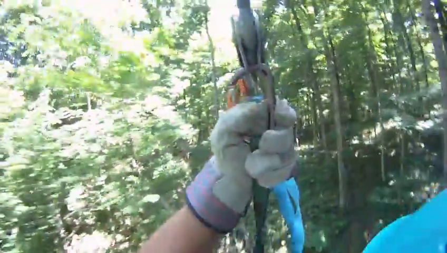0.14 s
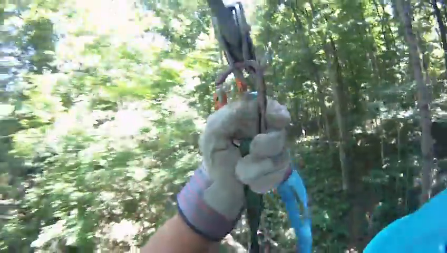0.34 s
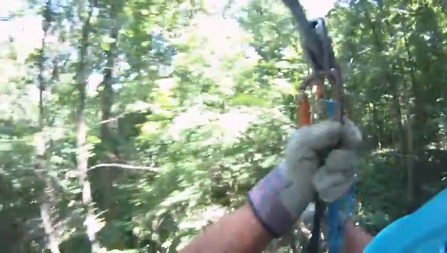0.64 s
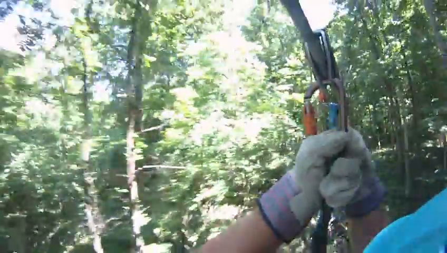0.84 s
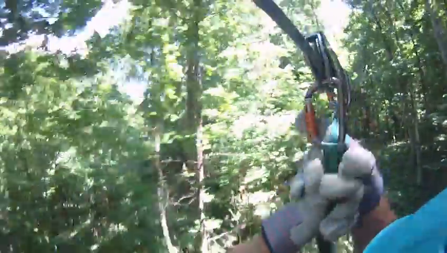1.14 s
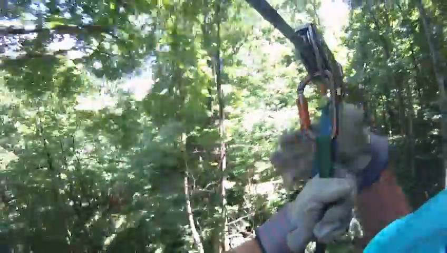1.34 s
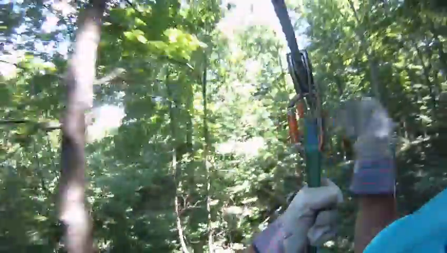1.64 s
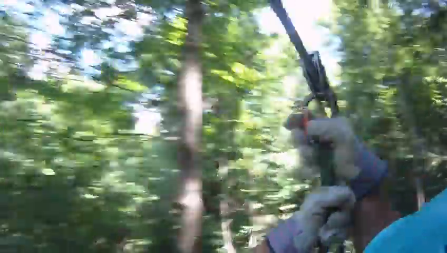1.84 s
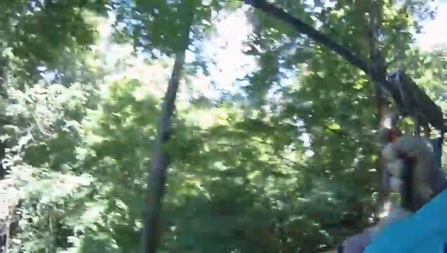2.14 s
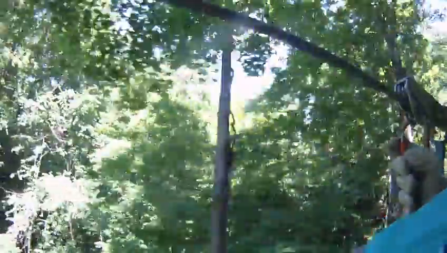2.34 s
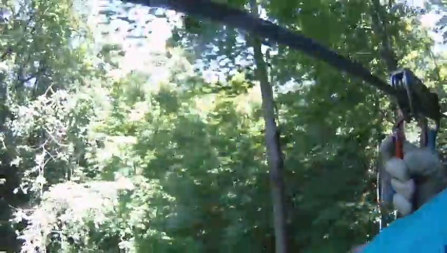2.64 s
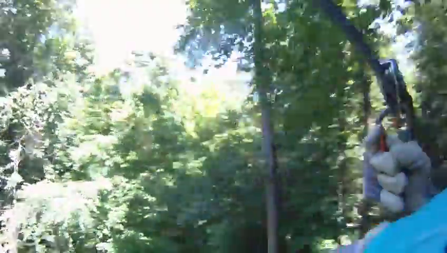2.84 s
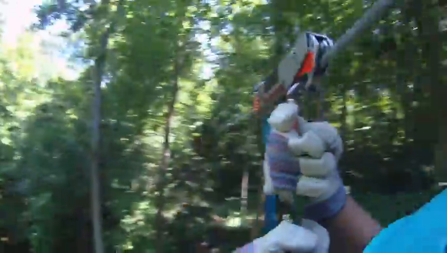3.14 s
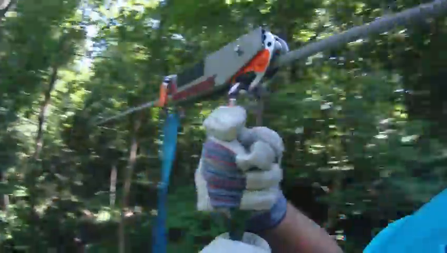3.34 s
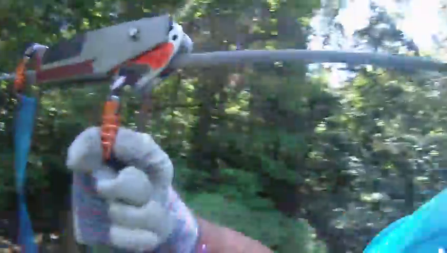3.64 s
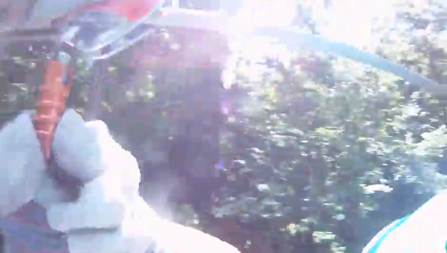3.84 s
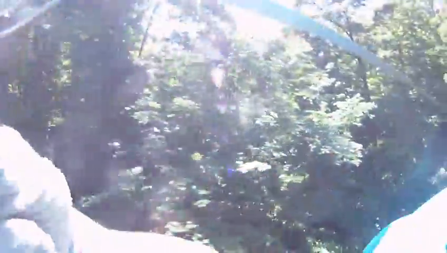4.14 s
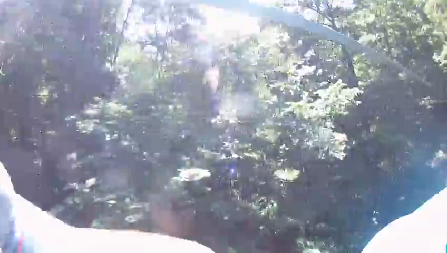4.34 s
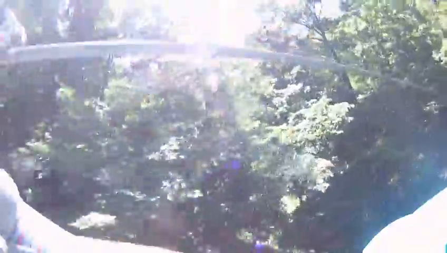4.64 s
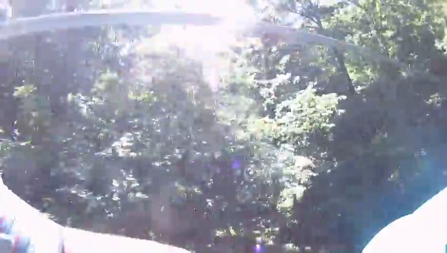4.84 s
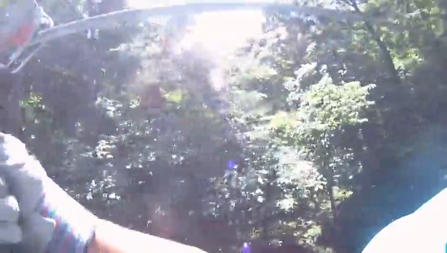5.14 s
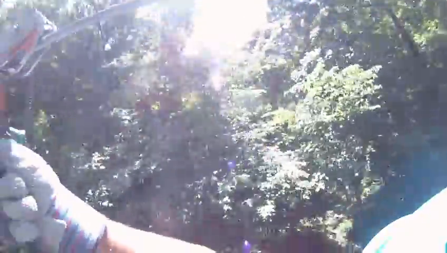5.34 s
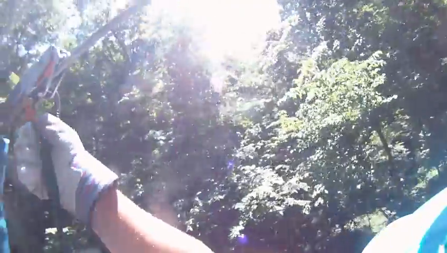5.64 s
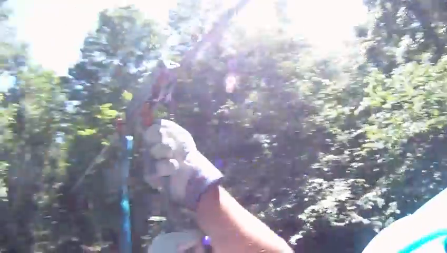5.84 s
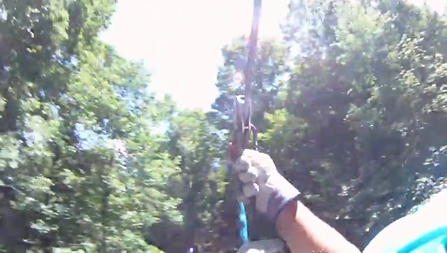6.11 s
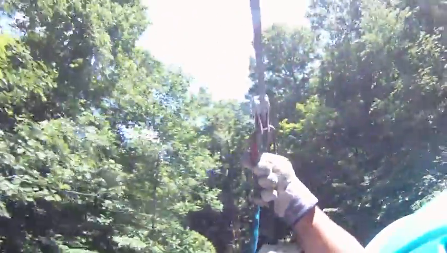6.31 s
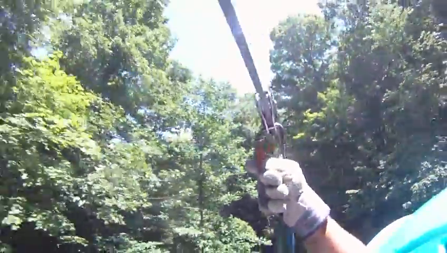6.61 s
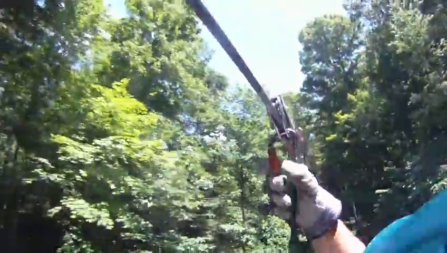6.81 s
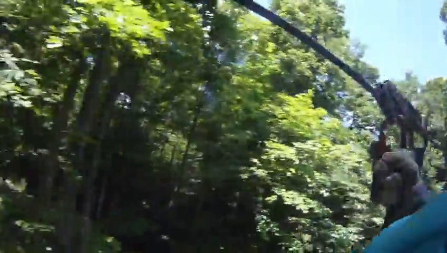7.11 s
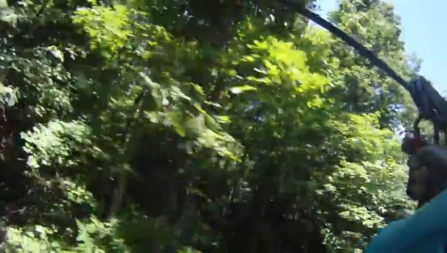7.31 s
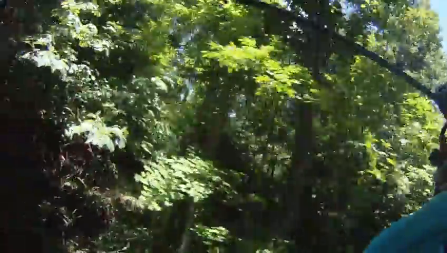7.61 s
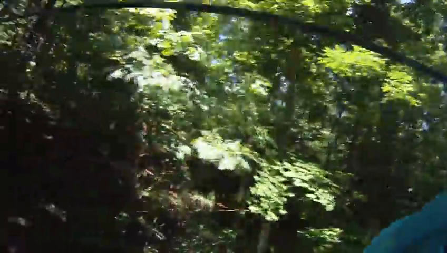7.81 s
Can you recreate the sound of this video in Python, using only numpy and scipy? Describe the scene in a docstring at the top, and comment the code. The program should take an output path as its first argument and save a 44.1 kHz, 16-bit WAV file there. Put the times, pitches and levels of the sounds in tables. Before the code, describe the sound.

Harsh, steady metallic whirring of small wheels racing over a stranded cable, with snapping ticks, dull gear knocks and low air rumble.

```python
"""Zip line trolley ride

Sheaves chatter over the wire strands of a steel cable; clicks, hiss and sharp ticks ring the metal frame.
The frame's colour changes as the rider swings round. Swept sines make the faint strand whine that follows the
speed, over a hum of shaped noise. Decaying sines make the gear's knocks, noise puffs the shifting webbing,
and low shaped noise the air rumbling at the microphone."""
import sys
import numpy as np
from scipy import signal
from scipy.fft import rfft, irfft, next_fast_len
from scipy.io import wavfile
from scipy.ndimage import uniform_filter1d, minimum_filter1d

SR = 44100
rng = np.random.default_rng(int(sys.argv[2]) if len(sys.argv) > 2 else 0)


def wav_record(signal):
    """Record a signal, one row per channel, as 16-bit PCM in the file named by sys.argv[1]."""
    frames = np.transpose(np.atleast_2d(signal))
    bounded = np.clip(frames, -1, 1)
    # unit amplitude maps onto the largest positive 16-bit level
    quanta = np.round(bounded * 32767).astype(np.int16)
    wavfile.write(sys.argv[1], SR, quanta)


N = 351459
TAPS = 4096
TIME = np.arange(N) / SR
BINS_HZ = np.fft.rfftfreq(TAPS, 1 / SR)

# Trolley frame modes. Each row: frequency in Hz, half-width at half amplitude in Hz, then relative level in dB
# seen edge-on, from the right side, from the left side.
FRAME_MODES = [ (770, 114, -27, -26, -27), (1094, 28, -6, -3, -2), (1254, 30, -17.5, -24, -17.5),
               (1454, 134, -16, -15.5, -14), (1784, 70, -13, -6.5, -9.5), (2095, 107, -1, -55, -4.5),
               (2201, 54, -57, 5.5, -6), (2340, 168, -4, -7, 0), (2720, 74, -57, -14.5, -55),
               (2940, 69, -12.5, -5.5, -9), (3162, 86, -11.5, -57, -8), (3647, 122, 2, -0.5, 3),
               (3843, 176, -0.5, -2, -2.5), (4397, 107, -14, -7, -8.5), (4680, 140, -15, -10.5, -9.5),
               (5272, 293, -8, -13.5, -12), (5530, 89, -13.5, -37, -16), (6550, 202, -9.5, -17.5, -14),
               (6890, 217, -12.5, -15, -15), (7520, 174, -16, -11.5, -12), (8150, 117, -6.5, -6.5, -5),
               (8376, 81, -5.5, -7.5, -2.5), (8650, 150, -16.5, -35, -23), (9090, 95, -21, -15.5, -14.5),
               (9750, 178, -17, -15, -12), (9840, 53, -28, -9.5, -24), (10570, 77, -24.5, -25, -27),
               (14900, 200, -50, -51, -66), (14130, 78, -15, -12, -12), (14660, 130, -20.5, -19, -16.5)]
# Side of the trolley facing the rider. Each row: time in seconds, side (-1 right, 0 edge-on, 1 left; clipped).
FACING_SIDE = [(0, 0.057), (.4, -0.36), (.6, 0.088), (1.85, 0.11), (2.15, -0.98), (2.85, -0.65),
               (3.25, -0.27), (3.5, 1), (5.8, 1), (6.05, 0.25), (6.9, -0.39), (7.2, -0.87), (7.97, -1.5)]
# How hard the sheaves bear on the cable. Each row: time in seconds, relative whir level in dB.
WHIR_LEVEL = [(0.0, -16.5), (0.25, -15), (1.2, -17.0), (1.4, -16), (2.25, -19.5), (2.6, -19), (2.85, -17),
              (3.55, -16), (3.9, -13.5), (4.15, -15.5), (4.35, -14.5), (5.2, -14), (5.75, -17.1),
              (6.2, -23), (6.5, -22.5), (7.05, -19.5), (7.55, -21.5), (7.96, -19)]
# Trolley speed. Each row: time in seconds, strand passing rate in Hz.
STRAND_RATE = [(0, 522), (.35, 538), (1.3, 541), (1.97, 577), (2.3, 530), (2.8, 585), (3.15, 562),
               (3.55, 512), (3.93, 570), (4.42, 526), (4.72, 543), (5.08, 526), (5.35, 541), (6.12, 499),
               (6.55, 510), (7.2, 486), (7.5, 458), (7.97, 420)]
# Sharpest ticks of a sheave on a proud wire. Each row: time in seconds, relative level in dB.
HARD_TICKS = [(1.2411, -4), (3.3199, 0), (3.4376, 0), (3.7194, 1), (3.9639, -1), (4.6069, -1), (4.9651, 0)]
# Clicks against smooth rolling. Each row: frequency in Hz, click-to-hiss ratio in dB.
CLICK_TO_HISS = [(1000, -9.5), (2500, -8), (3700, -1), (4700, -9), (6200, 11), (7500, 1), (8400, -6.5),
                 (15000, 12.5)]
# Frame's low mode. Each row: time in seconds, relative level in dB.
LOW_MODE_LEVEL = [(0.0, -39.5), (0.5, -34.5), (0.95, -38), (1.2, -32), (1.75, -35), (2.0, -41.5),
                  (3.3, -36), (4.05, -47), (5.45, -36.5), (6.45, -43), (7.35, -39.5), (7.96, -42.5)]
# Frame modes swelling as the load shifts. Each row: time in seconds, middle modes against the whir table in
# relative dB, main modes likewise.
MODE_SWELLS = [(0, -5.2, -4), (0.4, -7, -2), (0.62, -10.5, -4.5), (1.3, -12.5, -4.5), (1.95, -10, -3),
               (2.15, -6, -4.5), (2.8, -4.6, -5.5), (3.15, -11, -3.6), (3.55, -6.7, 1), (3.82, -6.4, -3.5),
               (4.15, -7.5, -1), (4.7, -5, -3.5), (5.78, -2.5, -3), (5.97, -8, -0.7), (6.4, -5.5, -7.5),
               (7.25, -7, -5.5), (7.65, -3, -4), (7.96, -5, -3)]
# How strongly the cable sounds. Each row: time in seconds, mean strand whine level in dB.
WHINE_LEVEL = [(0, -63), (1.2, -59), (1.95, -54), (2.3, -59.5), (2.85, -54.5), (3.7, -53), (4.7, -59),
               (5.3, -56.5), (5.9, -68), (6.9, -58), (7.97, -73)]
# Low hum of the cable. Each row: frequency in Hz, relative density in dB per Hz.
HUM_SPECTRUM = [(200, 9), (330, -22), (480, -10), (620, 13.5), (800, 15), (1000, -12), (1500, -44),
                (4000, -80)]
# Air at the microphone. Each row: frequency in Hz, relative density in dB per Hz.
AIR_SPECTRUM = [(8.8, -45), (15, 7), (45, 0), (73, 0.5), (95, -4.5), (128, -13.5), (216, -14.5), (265, -24),
                (329, -25.5), (480, -22), (620, -65), (1060, -120)]
# Stronger buffets of air. Each row: centre in seconds, length between 1/e points in seconds, relative level in dB.
AIR_GUSTS = [(2.17, .1, -40), (2.48, 0.15, -40), (3.08, 0.11, -44), (4.52, .14, -50), (5.65, 0.58, -45),
             (6.05, 0.13, -41.5), (7.42, .14, -43), (7.72, .16, -48)]
# Dull knocks of the gear. Each row: start in seconds, relative level in dB.
GEAR_KNOCKS = [(1.419, -44), (5.801, -35.5), (5.899, -36)]
# Gear modes. Each row: frequency in Hz, relative level in dB, 60 dB decay time in seconds.
GEAR_MODES = [(229, -20, 0.035), (430, -6, 0.046), (556, -7, .03), (686, 0, 0.055), (755, -3, .05)]
# Webbing shifting under load. Each row: centre in seconds, length between 1/e points in seconds, level in dB.
WEBBING_PUFFS = [(2.076, .07, -49), (2.17, 0.048, -56), (2.923, 0.21, -59), (3.92, 0.091, -60),
                 (6.94, 0.078, -52)]
# Webbing noise. Each row: frequency in Hz, relative density in dB per Hz.
WEBBING_SPECTRUM = [(60, -15), (150, 3.5), (280, -3), (420, -5), (700, -8), (1500, -30), (5000, -70)]


def gain_of(db):
    """Decibels to amplitude."""
    return 10 ** (np.asarray(db) / 20)


def evened(x):
    """Scales to an rms of 1."""
    return x / np.sqrt(np.mean(x ** 2) + 1e-20)


def curve(rows, axis=1):
    """One column of a time table, interpolated at every sample."""
    rows = np.asarray(rows, float)
    return np.interp(TIME, rows[:, 0], rows[:, axis])


def spectrum(points, hz):
    """Amplitude of a (Hz, dB) table, interpolated on a log-frequency axis."""
    f, db = np.transpose(points)
    return gain_of(np.interp(np.log(hz + 1), np.log(f + 1), db))


def noise(shape):
    """Noise of about rms 1 whose amplitude spectrum follows shape(Hz)."""
    size = next_fast_len(N)
    white = rfft(rng.standard_normal(size))
    shaped = irfft(white * shape(np.fft.rfftfreq(size, 1 / SR)), size)
    return evened(shaped[:N])


def flutter(top_hz):
    """Random motion of rms 1, mostly from about 2 Hz to top_hz."""
    return noise(lambda hz: hz / (hz + 2) / (1 + (hz / top_hz) ** 2))


def ring(x, gain):
    """Minimum-phase body with this gain at BINS_HZ: sharp attack, then ringing."""
    two_sided = np.r_[gain, gain[-2:0:-1]]
    log_gain = np.log(np.maximum(two_sided, 1e-6))
    response = np.fft.ifft(np.exp(np.conj(signal.hilbert(log_gain)))).real
    return signal.oaconvolve(x, response)[:N]


def blows(rows):
    """One impulse for each (s, dB) row."""
    s, db = np.transpose(rows)
    return np.bincount(np.round(s * SR).astype(int), gain_of(db), N)[:N]


def puffs(rows):
    """A Gaussian rise and fall of amplitude for each (centre s, length s, dB) row."""
    return sum(gain_of(db) * np.exp(-(2 * (TIME - s) / length) ** 2) for s, length, db in rows)


def load_db():
    """Load on the sheaves, taken as the whir level above its mean."""
    whir_db = curve(WHIR_LEVEL)
    return whir_db - whir_db.mean()


def facing():
    """Side of the trolley the rider sees, -1 right to 1 left."""
    return np.clip(curve(FACING_SIDE), -1, 1)


def force(chatter_hz=110, chatter_db=0.68, chatter_db_per_load_db=.15, rock_hz=14, rock_db=0.42,
          repeat=0.54, strands_per_turn=44):
    """The contact force chatters, more under load and partly alike in each turn of the sheave."""
    turns = np.cumsum(curve(STRAND_RATE)) / SR / strands_per_turn
    mean_turn_s = TIME[-1] / turns[-1]
    groove = np.interp(turns % 1 * mean_turn_s, TIME, flutter(chatter_hz))
    repeating = repeat * evened(groove - groove.mean())
    bumps = repeating + np.sqrt(1 - repeat ** 2) * flutter(chatter_hz)
    depth_db = chatter_db + chatter_db_per_load_db * load_db()
    return gain_of(depth_db * bumps + rock_db * flutter(rock_hz))


def click_share():
    """Amplitude share of clicks at each frequency; smooth hiss supplies the remaining power."""
    ratio = spectrum(CLICK_TO_HISS, BINS_HZ)
    return ratio / np.hypot(1, ratio)


def contacts(spread_db=3.0, jitter_strands=.25, jitter_hz=300, strays_per_s=350):
    """Jittered strand crossings click, single wires add stray clicks, and smooth rolling hisses."""
    travel_strands = np.cumsum(curve(STRAND_RATE)) / SR
    strands = np.floor(travel_strands + jitter_strands * flutter(jitter_hz))
    crossing = np.diff(strands, prepend=0) > 0
    hit = crossing | (rng.random(N) < strays_per_s / SR)
    hardness = np.minimum(rng.exponential(1, N), 2.5)
    clicks = evened(hit * gain_of(spread_db * hardness) * rng.choice([-1, 1], N))
    share = click_share()
    hiss = ring(rng.standard_normal(N), np.sqrt(1 - share ** 2))
    return ring(clicks, share) + hiss


def frame(drive):
    """The frame's modes ring; each side radiates them in its own proportions."""
    modes = np.array(FRAME_MODES, float)
    side_seen = facing()
    offset = (BINS_HZ[:, None] - modes[:, 0]) / modes[:, 1]
    bells = 1 / (1 + offset ** 2) ** 2  # power
    shares = 1 - abs(side_seen), np.maximum(-side_seen, 0), np.maximum(side_seen, 0)
    sides = [evened(np.sqrt(bells @ gain_of(db) ** 2)) for db in modes[:, 2:].T]
    return sum(share * ring(drive, side) for share, side in zip(shares, sides))


def swell(x, edges_hz, level_db):
    """Makes the modes in one band grow and fade to their own slow rms level."""
    band = signal.butter(2, edges_hz, "bandpass", fs=SR, output="sos")
    part = signal.sosfiltfilt(band, x)
    slow_rms = np.sqrt(abs(uniform_filter1d(part ** 2, SR // 3)) + 1e-12)
    return x + part * (gain_of(level_db) / slow_rms - 1)


def ticks(tick_db=9, stray_db=22, spread_db=4, strays_per_s=30, band_hz=(4200, 7600)):
    """Proud wires strike the sheaves with a thin, bright snap: a few hard ones, lighter ones at random."""
    stray_hits = rng.random(N) < strays_per_s / SR
    strays = stray_hits * gain_of(spread_db * (2 * rng.random(N) - 1))
    strikes = gain_of(tick_db) * blows(HARD_TICKS) + strays * gain_of(curve(WHIR_LEVEL) + stray_db)
    return signal.sosfilt(signal.butter(2, band_hz, "bandpass", fs=SR, output="sos"), strikes)


def trolley(whir_db=0.37, low_db=-2.14, middle_db=-0.7, main_db=-0.65, buzz_db=1.0, buzz_hz=110,
            low_hz=(1035, 1155), middle_hz=(1900, 2550), main_hz=(3400, 4050)):
    """Rolling contacts and ticks excite the same frame; the whir's main modes buzz with a random flutter."""
    level_db = curve(WHIR_LEVEL)
    whir = evened(frame(force() * contacts())) * gain_of(level_db + whir_db)
    whir = swell(whir, low_hz, curve(LOW_MODE_LEVEL) + low_db)
    whir = swell(whir, middle_hz, level_db + curve(MODE_SWELLS, axis=1) + middle_db)
    buzz = buzz_db * flutter(buzz_hz)
    whir = swell(whir, main_hz, level_db + curve(MODE_SWELLS, axis=2) + main_db + buzz)
    return whir + frame(ticks())


def cable(wobble=0.0087, wobble_hz=25.5, waver_db=1.5, octave_db=-3, sing_db=-7.5, mode_hz=1088,
          mode_width_hz=48, hum_db=-52, follow_load=.35, follow_whine=0.18):
    """Passing strands whine over a soft hum; the octave sings out on crossing the frame's low mode."""
    strand_hz, whine_db = curve(STRAND_RATE), curve(WHINE_LEVEL)
    phase = 2 * np.pi * np.cumsum(strand_hz * (1 + wobble * flutter(wobble_hz))) / SR
    whine = gain_of(whine_db + waver_db * flutter(6.4))
    in_tune = 1 / (1 + ((2 * strand_hz - mode_hz) / mode_width_hz) ** 2)
    singing = in_tune * gain_of(curve(LOW_MODE_LEVEL) + sing_db + waver_db * flutter(20))
    octave = gain_of(octave_db) * whine + singing
    tones = np.sqrt(2) * (whine * np.sin(phase) + octave * np.sin(2 * phase))  # rms levels to peaks
    hum = gain_of(hum_db + follow_load * load_db() + follow_whine * (whine_db - whine_db.mean()))
    return tones + hum * noise(lambda hz: spectrum(HUM_SPECTRUM, hz))


def air(level_db=-47.0, shelter_db=3.5, lump_db=1.9, lump_hz=11, lull_s=4.0, lull_length_s=.7, lull_db=-4.5):
    """Passing air rumbles lumpily, weaker as the rider swings to the trolley's left, with gusts and one lull."""
    level = np.hypot(gain_of(level_db - shelter_db * facing()), puffs(AIR_GUSTS))
    lull = lull_db * np.exp(-(2 * (TIME - lull_s) / lull_length_s) ** 2)
    rumble = noise(lambda hz: spectrum(AIR_SPECTRUM, hz))
    return rumble * level * gain_of(lull + lump_db * flutter(lump_hz))


def gear():
    """Harness gear knocks: each blow starts a few short, decaying modes."""
    t = TIME[:TAPS]
    knock = sum(gain_of(db - 60 * t / t60_s) * np.sin(2 * np.pi * hz * t) for hz, db, t60_s in GEAR_MODES)
    return signal.oaconvolve(blows(GEAR_KNOCKS), knock)[:N]


def webbing():
    """Harness straps shift under load in soft, low puffs of noise."""
    return puffs(WEBBING_PUFFS) * noise(lambda hz: spectrum(WEBBING_SPECTRUM, hz))


def scene():
    """Everything reaches one microphone, the same in both channels."""
    mono = trolley() + cable() + air() + gear() + webbing()
    return np.tile(mono, (2, 1))


def record(dry, ceiling=.95, window_samples=129, edge_hz=15400):
    """A quick look-ahead peak limiter, then a linear-phase low-pass."""
    needed_gain = 1 / np.maximum(abs(dry).max(0) / ceiling, 1)
    held_gain = minimum_filter1d(needed_gain, size=window_samples)
    limited = dry * uniform_filter1d(held_gain, size=window_samples)
    low_pass = signal.firwin(511, edge_hz, window=("kaiser", 9), fs=SR)
    return signal.oaconvolve(limited, low_pass[None], "same", axes=1)


dry = scene()
out = record(dry)
wav_record(out)
```